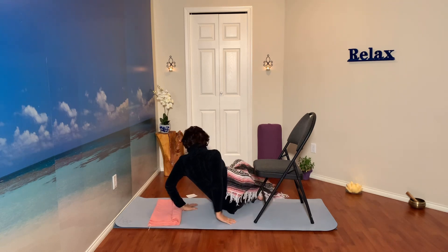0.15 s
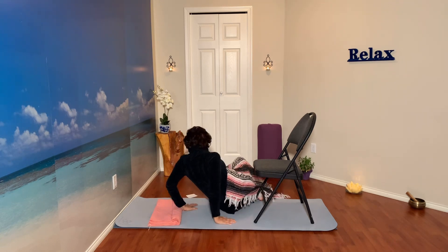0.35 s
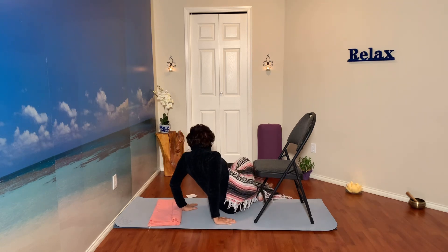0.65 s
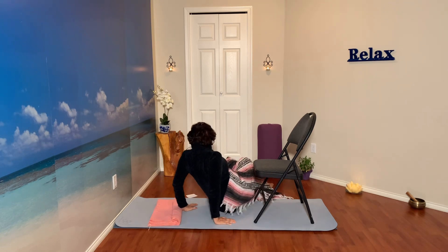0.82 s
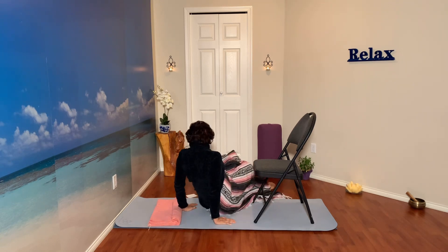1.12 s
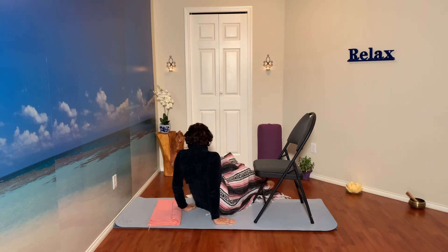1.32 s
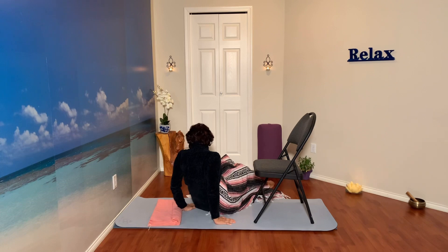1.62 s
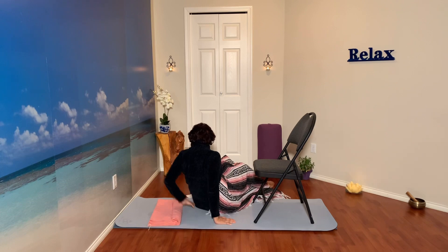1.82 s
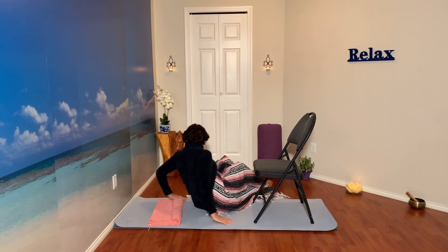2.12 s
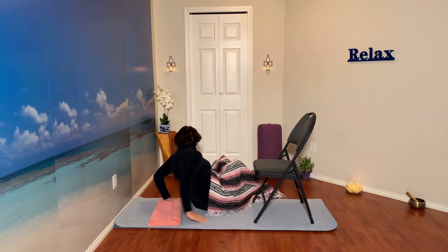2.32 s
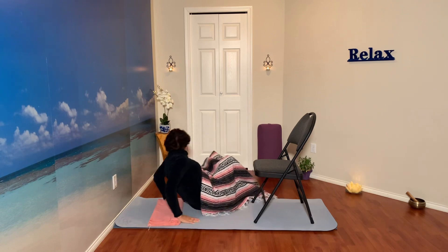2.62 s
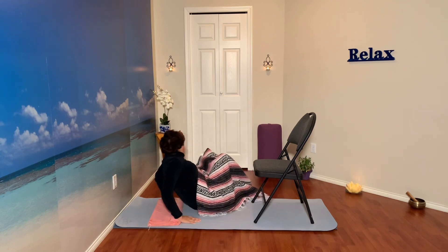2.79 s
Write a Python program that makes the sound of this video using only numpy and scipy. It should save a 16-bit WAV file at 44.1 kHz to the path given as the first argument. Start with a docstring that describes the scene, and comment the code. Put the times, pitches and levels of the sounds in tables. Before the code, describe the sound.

Cloth and blanket rustling in close bursts, with small crackly snaps and a hard late tap

```python
"""Swelling rustles come first: cloth rubs on cloth and mat, close to a small clip-on microphone.
Dense fibre catches mixed with smooth friction noise are shaped in bands; taut drags ring through resonances.
Now and then a fibre snaps at the capsule, hardest near the end: a push-pull pulse with a short fizz.
A far motor hums faintly as two wavering sines over the room tone, steady dull noise."""
import sys
import numpy as np
from scipy import signal
from scipy.io import wavfile

SR = 44100
rng = np.random.default_rng(int(sys.argv[2]) if len(sys.argv) > 2 else 0)


def unload_audio(sound):
    """Save the sound as a 16-bit wav file, at the path given as the first command line argument."""
    columns = np.transpose(np.atleast_2d(sound))
    # keep every value between -1 and 1, then stretch to whole-number steps
    steps = np.round(np.clip(columns, -1, 1) * 32767)
    wavfile.write(sys.argv[1], SR, steps.astype(np.int16))


def decibels_to_gain(level_db):
    """Convert a level in decibels to a linear amplitude gain (20 dB per decade)."""
    exponent = np.asarray(level_db, float) / 20
    return 10 ** exponent


N = 130095


def rms_one(x):
    """Scale to rms 1."""
    return x / np.sqrt(np.mean(x ** 2) + 1e-20)


def in_time(rows):
    """Join curve rows (time_s first) by straight lines."""
    time_s, *columns = np.transpose(rows)
    return [np.interp(np.arange(N) / SR, time_s, column) for column in columns]


def at_hz(points, hz):
    """Read a spectrum in dB on a log frequency axis."""
    point_hz, point_db = np.array(points).T
    return np.interp(np.log(hz), np.log(point_hz), point_db)


def drift(rate_hz):
    """Slow random wander of rms 1: noise through a double pole, run at SR / 40."""
    pole = np.exp(-80 * np.pi * rate_hz / SR)
    noise = rng.standard_normal(N // 40 + 2002)
    slow = signal.lfilter([1], [1, -2 * pole, pole * pole], noise)[2000:]  # settled part
    return np.interp(np.arange(N) / 40, np.arange(len(slow)), rms_one(slow))


def bands(sources):
    """Yield third-octave bands (centre_hz, band), neighbours drawn from alternate sources."""
    edges_hz = 30 * 2 ** np.arange(0, 8.3, 1 / 3)
    for k, (low_hz, high_hz) in enumerate(zip(edges_hz, edges_hz[1:])):
        sos = signal.butter(2, [low_hz, high_hz], "band", fs=SR, output="sos")
        yield np.sqrt(low_hz * high_hz), signal.sosfilt(sos, sources[k % 2])


def rustle(patchy_db):
    """Cloth friction: sparse fibre catches plus smooth noise, each band on the nearest level curves."""
    # rubbing strength: time_s, weave_db (1.3-3 kHz), scuff_db (dull), hiss_db (fine)
    rub = [(0, -43.5, -37.5, -43), (0.035, -53, -51.0, -55.0), (0.06, -53.5, -47.5, -56),
           (0.09, -48, -44, -53), (0.12, -58, -47.5, -62), (0.16, -57.5, -56.5, -66),
           (0.195, -51, -57.5, -64.5), (0.23, -56, -54.5, -68), (0.27, -56, -57, -68.5),
           (0.34, -62.5, -58.5, -70), (0.4, -68, -59, -76), (0.55, -70.0, -84, -80), (0.76, -77, -84, -90),
           (0.8, -52, -65, -82), (0.82, -50, -55, -70), (0.85, -45, -42, -56), (0.88, -36.5, -38, -45.5),
           (0.92, -37, -38.0, -43.0), (0.96, -33, -37.5, -45), (1.0, -36, -34.5, -48.5),
           (1.05, -40.5, -35.5, -47), (1.08, -45, -43, -57), (1.11, -56, -51, -71), (1.16, -59, -55, -71),
           (1.25, -64.5, -55, -70.0), (1.31, -64, -59.5, -62), (1.34, -58.0, -55.5, -61),
           (1.365, -61, -52, -49), (1.385, -46.5, -47, -39), (1.4, -53.0, -60, -62),
           (1.415, -58.0, -55.5, -68), (1.46, -66, -60.5, -71), (1.49, -63.5, -71, -67.0),
           (1.51, -48, -52.0, -72), (1.535, -43.5, -49, -62), (1.55, -58.5, -64, -68),
           (1.57, -53, -49, -47), (1.59, -59, -48.5, -62), (1.62, -62, -60, -70), (1.66, -66, -56, -70.0),
           (1.685, -58, -54, -56.5), (1.703, -47, -53, -45), (1.725, -68, -52, -62),
           (1.75, -63, -56, -66.0), (1.79, -55, -75.0, -61.5), (1.83, -68, -88, -68.5),
           (1.855, -52, -57, -55), (1.895, -41.5, -49.5, -47), (1.925, -47.5, -57, -54),
           (1.955, -39.5, -50.5, -46), (1.98, -40.5, -45, -44.5), (2.015, -47.5, -57.5, -53.5),
           (2.055, -45.5, -51.5, -51), (2.085, -49, -53, -54), (2.11, -59, -56, -68.5),
           (2.15, -62, -66, -70), (2.3, -62.5, -71, -75), (2.44, -64.5, -70, -70.5),
           (2.49, -55, -54.5, -74), (2.52, -54.5, -46, -61.5), (2.56, -46.5, -41, -48.5),
           (2.6, -38.5, -36, -39), (2.64, -40.5, -41.5, -40.5), (2.69, -37.0, -36, -40.0),
           (2.72, -42, -40, -39), (2.733, -41.0, -51, -46), (2.755, -40.5, -35, -33.5),
           (2.77, -32.5, -36.5, -34.5), (2.79, -28.5, -21.5, -33), (2.815, -38, -40.5, -35.5),
           (2.835, -43.5, -49, -48), (2.855, -44.5, -42.5, -37), (2.885, -35.5, -38, -34.5),
           (2.915, -38.5, -42.5, -33), (2.93, -35.5, -40, -36.5), (2.95, -39, -42, -34.5)]
    # colour of rubbing cloth: freq_hz, density_db (per Hz, relative)
    cloth = [(30, -27.5), (120, -29.5), (230, -17), (400, -0.5), (700, 1), (1200, -6), (2100, -11),
             (3200, -4), (4600, -7), (5800, -12), (6900, -14), (8200, -16)]
    catches_per_s, catch_spread_db, smooth_share = 500, 4, 0.72
    centres_hz = [604, 2100, 4600]  # scuff, weave, hiss
    widths_hz = np.array([750, 1700, 3000])

    caught = rng.random(N) < catches_per_s / SR
    catch_db = catch_spread_db * np.minimum(rng.exponential(1, N), 5)
    catches = rms_one(caught * decibels_to_gain(catch_db) * rng.choice([-1, 1], N))
    smooth = rng.standard_normal((2, N))
    sources = np.sqrt(smooth_share) * smooth + np.sqrt(1 - smooth_share) * catches

    weave_db, scuff_db, hiss_db = in_time(rub)
    # level of the coloured source in each range, before the curves act
    base_db = at_hz(cloth, centres_hz) + 10 * np.log10(widths_hz * 2 / SR)
    gains_db = [curve - base for curve, base in zip((scuff_db, weave_db, hiss_db), base_db)]
    out = 0
    for hz, band in bands(sources):
        weights = [np.interp(np.log(hz), np.log(centres_hz), row) for row in np.eye(3)]
        level_db = sum(weight * gain for weight, gain in zip(weights, gains_db))
        out = out + band * decibels_to_gain(level_db + at_hz(cloth, hz) + patchy_db * drift(20))
    return out


def drags():
    """Taut cloth rings in a narrow range: noise twice through one resonance, swelling and fading."""
    # drags: start_s, length_s, centre_hz, width_hz (each pass), level_db (rms at the crest)
    drag_rows = [(0.032, 0.092, 3230, 600, -42), (.0, 0.14, 2370, 400, -45.5),
                 (0.219, 0.068, 716, 200, -51), (0.278, 0.11, 675, 250, -56.5),
                 (0.799, 0.046, 880, 349, -48.5), (1.374, 0.027, 470, 200, -47.5),
                 (2.21, 0.35, 3230, 500, -64), (2.242, 0.36, 880, 251, -64), (2.515, 0.085, 586, 150, -47),
                 (2.642, 0.051, 810, 257, -45.5), (2.83, 0.044, 732, 250, -43)]
    out, t = np.zeros(N), np.arange(N) / SR
    for start_s, length_s, hz, width_hz, level_db in drag_rows:
        b, a = signal.iirpeak(hz, hz / width_hz, fs=SR)
        once = signal.lfilter(b, a, rng.standard_normal(N))
        ring = rms_one(signal.lfilter(b, a, once))
        phase = np.clip((t - start_s) / length_s, 0, 1)
        swell = np.sqrt(np.sin(np.pi * phase).clip(0))
        out += decibels_to_gain(level_db) * ring * swell
    return out


def snaps():
    """Each fibre snap is one push-pull of air, then a short fizz of settling fibres."""
    # snaps: time_s, level_db, pitch_hz
    snap_rows = [(1.288, -43, 4030), (1.3692, -25.5, 4600), (1.3841, -34.5, 3600), (1.388, -25, 4200),
                 (1.3925, -27, 4050), (1.3993, -35, 3500), (1.4158, -43.5, 4170), (1.4202, -46, 4140),
                 (1.5009, -19.5, 2870), (1.5055, -20.5, 2200), (1.5173, -19, 2400), (1.5178, -47, 2400),
                 (1.5237, -28, 3000), (1.5297, -17.5, 3000), (1.5557, -22, 1780), (1.5745, -16.5, 2400),
                 (1.5972, -28.5, 2400), (1.6807, -37, 3470), (1.7695, -31.5, 2850), (1.7881, -36, 3600),
                 (1.7967, -35.5, 3600), (2.7085, -21.5, 3800), (2.7407, -14, 1900), (2.7731, -4.5, 2100),
                 (2.7745, -37, 2500), (2.7841, 0.5, 1850), (2.7863, -15.5, 2780), (2.7874, -1, 2374),
                 (2.7928, -4.5, 2100), (2.7941, -24, 2500), (2.8004, -16, 2500), (2.8061, -5.5, 2500),
                 (2.8202, -16.5, 2500)]
    width_s, rebound = 0.0001, 1.02  # Gaussian sigma; gain of the pull half
    tail_db, tail_t60_s, tail_band_hz = -13, 0.0071, [500, 4700]
    bass_cut_hz = 172

    out = np.zeros(N + SR)
    t, after_s = np.arange(-40, 41) / SR, np.arange(SR // 10) / SR
    fizz_sos = signal.butter(1, tail_band_hz, "band", fs=SR, output="sos")
    fizz = rms_one(signal.sosfilt(fizz_sos, rng.standard_normal(N + SR)))
    # 1.367 brings the pulse peak near 1 at about 2.8 kHz
    window = 1.367 * np.exp(-0.5 * (t / width_s) ** 2) * np.where(t > 0, rebound, 2 - rebound)
    for time_s, level_db, pitch_hz in snap_rows:
        i = int(time_s * SR) - 4  # pulse centre
        out[i - 40:i + 41] += decibels_to_gain(level_db) * -np.sin(2 * np.pi * pitch_hz * t) * window
        decay = decibels_to_gain(level_db + tail_db - 60 * after_s / tail_t60_s)
        out[i + 8:i + 8 + len(after_s)] += decay * fizz[i:i + len(after_s)]
    return signal.sosfilt(signal.butter(2, bass_cut_hz, "high", fs=SR, output="sos"), out[:N])


def motor():
    """Second and third orders of a slowing far motor, wavering in pitch and level."""
    # motor: time_s, turns_hz, second_order_db, third_order_db
    motor_rows = [(0, 101, -85, -85), (.4, 100, -83.5, -84), (.75, 98, -85, -78.5), (.9, 97.5, -86, -55),
                  (1.2, 98, -75.5, -60.5), (1.45, 97, -75.5, -69), (1.6, 94.5, -74.5, -67.5),
                  (1.8, 93.6, -70, -69.5), (1.95, 93.3, -75.5, -64), (2.1, 93, -90, -83),
                  (2.95, 93, -94, -84)]
    turns_hz, second_db, third_db = in_time(motor_rows)
    turn = 2 * np.pi * np.cumsum(turns_hz * (1 + 0.008 * drift(6.8))) / SR
    second = decibels_to_gain(second_db + 3.6 * drift(14)) * np.sin(2 * turn)
    third = decibels_to_gain(third_db + 4 * drift(21)) * np.sin(3 * turn)
    return np.sqrt(2) * (second + third)


def room_tone():
    """Steady dull air of the room: banded noise, each band wandering about 1 dB."""
    # room colour: freq_hz, density_db (per Hz, relative)
    tone_colour = [(24, -62), (40, -55), (130, -35.5), (241, -10), (645, -2.5), (877, -3), (1240, -5.5),
                   (3100, -13), (4430, -17.5), (5800, -28.5), (7500, -42.5), (9750, -60)]
    room_db = -60.5  # rms
    sources = rng.standard_normal((2, N))
    out = sum(band * decibels_to_gain(at_hz(tone_colour, hz) + drift(3)) for hz, band in bands(sources))
    return decibels_to_gain(room_db) * rms_one(out)


def scene():
    """All sources at one microphone."""
    mix = rustle(patchy_db=1.91) + drags() + snaps() + motor() + room_tone()
    return mix[None]


def low_pass(x):
    """Removes everything above the highest recorded frequency."""
    return signal.sosfilt(signal.butter(12, 7870, fs=SR, output="sos"), x)


def record(dry):
    """The capsule rolls off, a narrow-band link cuts the top, circuit hiss adds a faint floor."""
    roll_off_hz, link_stop_hz, hiss_db = 5570, 7450, -98
    capsule = signal.butter(5, roll_off_hz, fs=SR, output="sos")
    link = signal.cheby2(12, 35, link_stop_hz, fs=SR, output="sos")
    x = signal.sosfilt(capsule, dry)
    x = signal.sosfiltfilt(link, x)
    mix = x + decibels_to_gain(hiss_db) * rng.standard_normal(x.shape)
    return low_pass(mix)


dry = scene()
out = record(dry)
unload_audio(out)
```